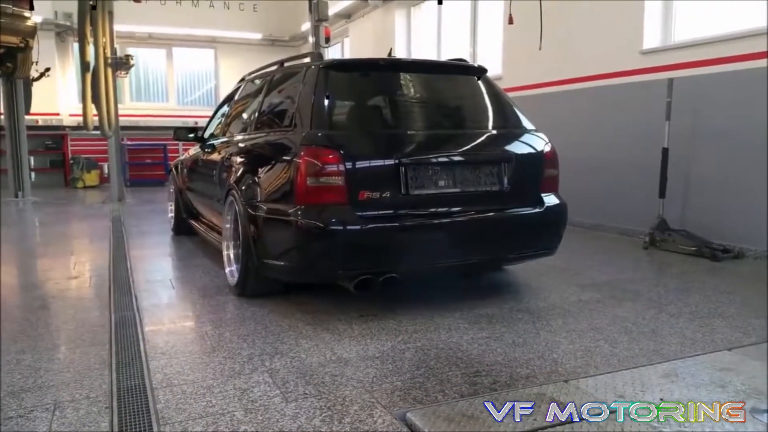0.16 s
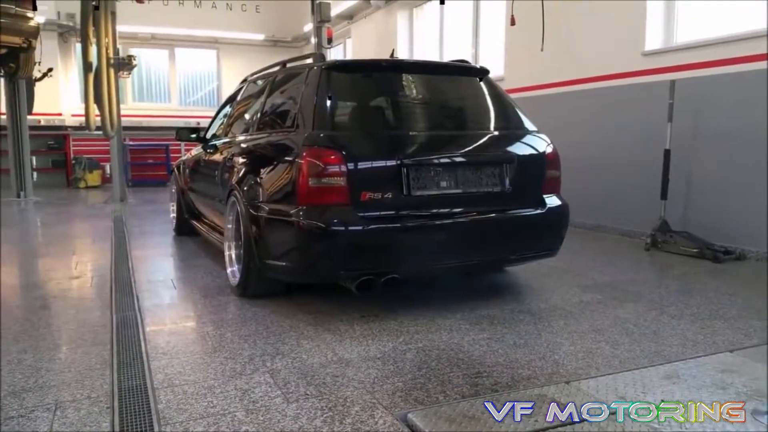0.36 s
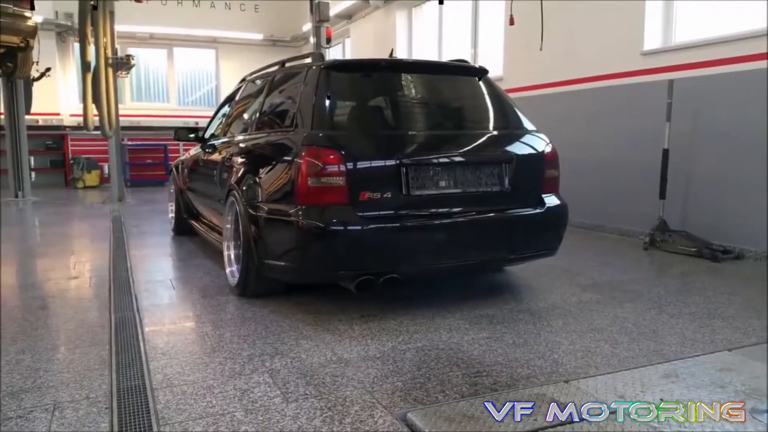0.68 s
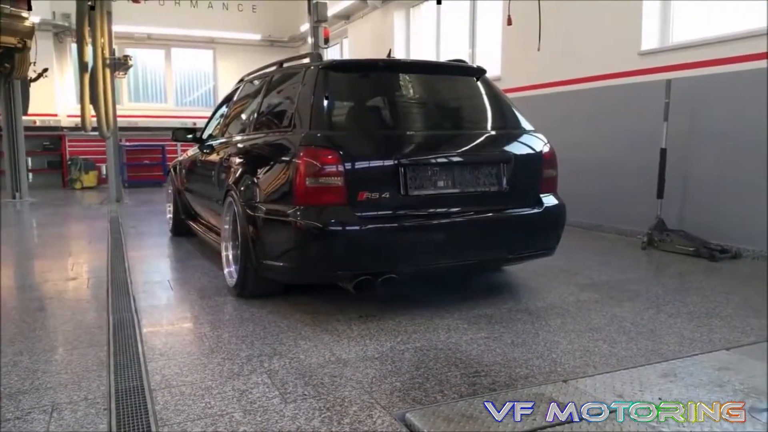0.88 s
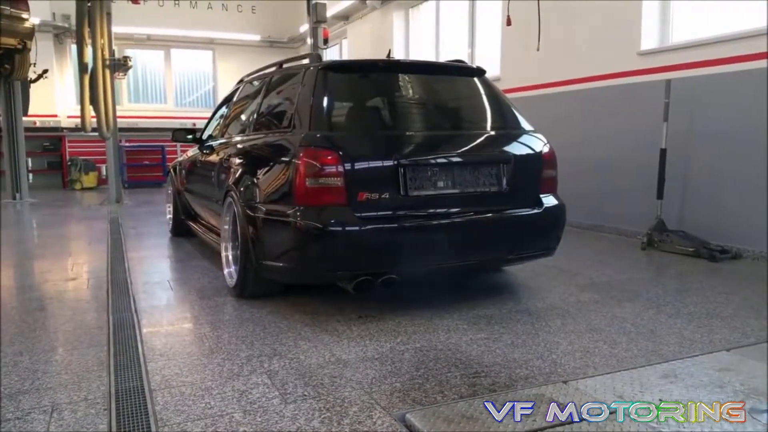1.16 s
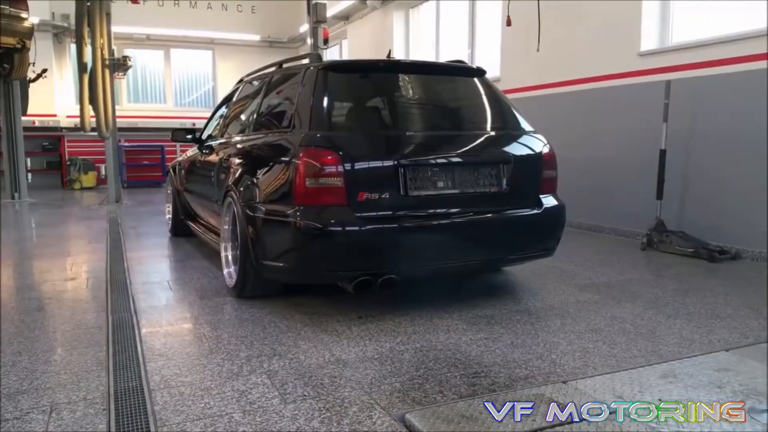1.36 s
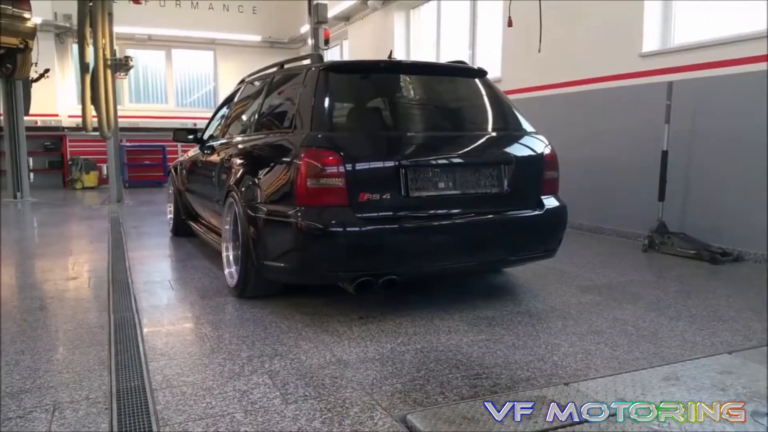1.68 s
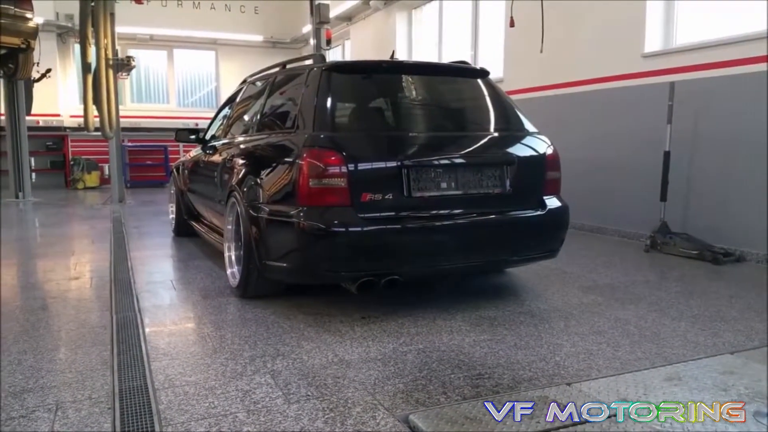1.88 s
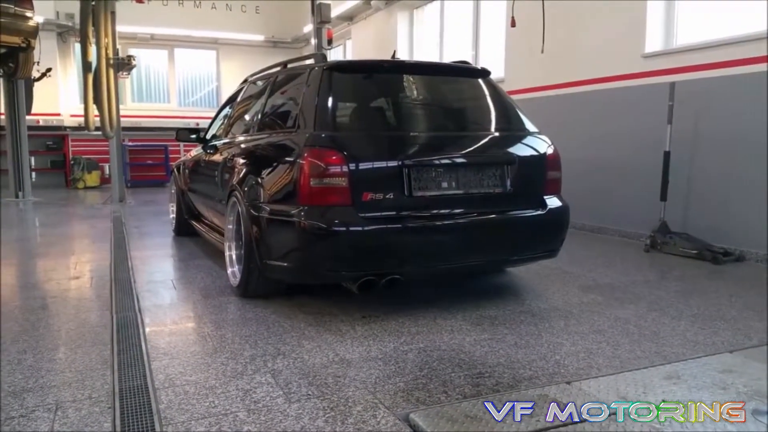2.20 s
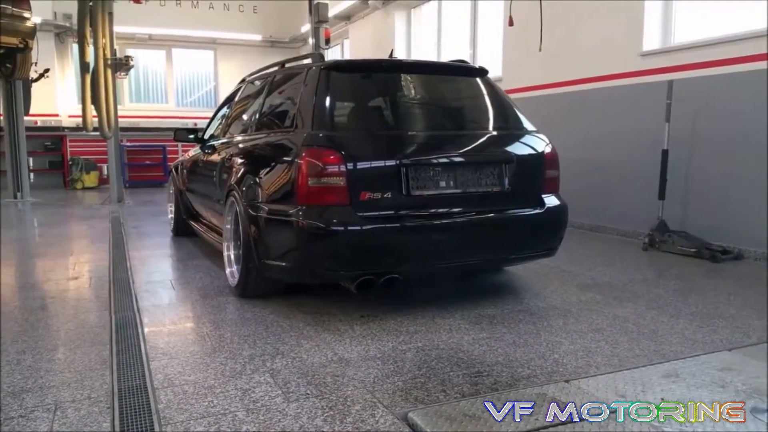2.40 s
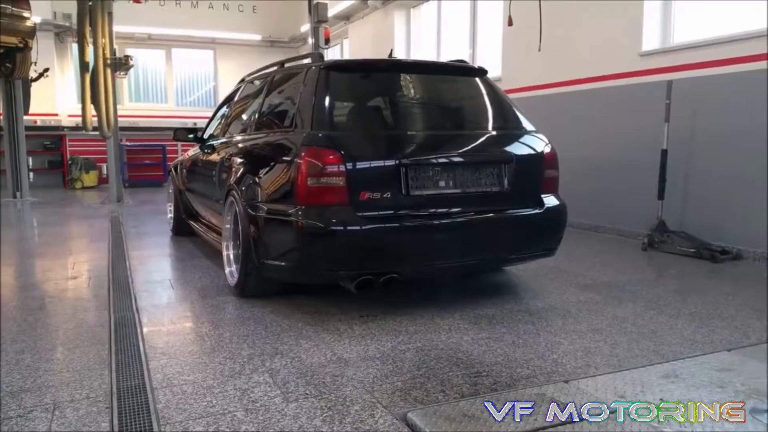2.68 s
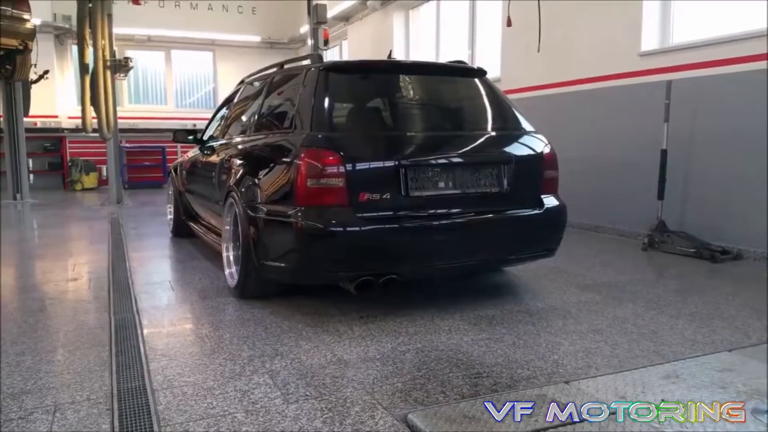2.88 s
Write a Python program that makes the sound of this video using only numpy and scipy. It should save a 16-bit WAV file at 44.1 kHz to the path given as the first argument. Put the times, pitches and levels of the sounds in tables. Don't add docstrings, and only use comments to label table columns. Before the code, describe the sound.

Two throttle blips of a six-cylinder car, heard behind the exhaust: a throaty rising roar, popping overrun, slow fall, then again, with boomy hall echo and slightly squashed peaks on the camera microphone.

```python
import sys
import numpy as np
from scipy import signal
from scipy.fft import rfft, irfft
from scipy.io import wavfile
from scipy.ndimage import uniform_filter1d

SR = 44100
rng = np.random.default_rng(int(sys.argv[2]) if len(sys.argv) > 2 else 0)


def digitize_waveform(pressure):
    field = np.atleast_2d(pressure).T
    bounded = np.clip(field, -1, 1)
    quanta = np.round(bounded * 32767).astype(np.int16)
    wavfile.write(sys.argv[1], SR, quanta)


def magnitude_from_level(level_db):
    exponent = np.asarray(level_db, float) / 20
    return 10 ** exponent


N = 134505
T = np.arange(N) / SR


def evened(x):
    return x / np.sqrt(np.mean(x ** 2) + 1e-20)


def read(points, hz):
    f, value = np.transpose(points)
    return np.interp(np.log(hz + 1), np.log(f + 1), value)


def colour(x, points):
    gain_db = read(points, np.fft.rfftfreq(len(x), 1 / SR))
    return irfft(rfft(x) * magnitude_from_level(gain_db), len(x))


def ring(x, modes, flip=-1):
    out = np.zeros(len(x))
    for k, (hz, width_hz, db) in enumerate(modes):
        b, a = signal.iirpeak(hz, hz / max(width_hz, 3), SR)
        out += flip ** k * magnitude_from_level(db) * signal.lfilter(b, a, x)
    return out


def state(column):
    # start_s, firing_rate_hz, firing_db, unevenness (0-1), gas_rush_db
    engine = [(0, 157.3, -16, .3, -3), (0.098, 157.6, -8.5, 0.09, -5), (.235, 189.8, -13.5, .16, -10),
              (.34, 262, -5.5, 0.06, -6), (.43, 309.4, -10.5, 0.29, -1), (0.528, 296.4, -11, 0.13, 1),
              (.75, 285.3, -20, 0.4, -1), (.95, 234, -18, 0.34, -1), (1.3, 173.5, -22.5, 0.1, -4),
              (1.458, 163.4, -13, .12, -6.5), (1.56, 195.9, -12.5, 0.17, -11), (1.65, 264.8, -6, 0, -4.5),
              (1.781, 338.5, -9, 0.24, 1.5), (1.858, 312.3, -16, 0.3, 0), (2.201, 285.9, -19.5, .3, 0),
              (2.43, 245.1, -18, 0.12, -2), (2.729, 221.6, -27, 0.03, -2.5), (3.002, 155.3, -17, .25, -6)]
    rows = np.array(engine)
    return uniform_filter1d(np.interp(T, rows[:, 0], rows[:, column]), size=900)


def turns():
    return np.cumsum(state(column=1)) / SR


def shut():
    # start_s, end_s
    closed = [
        (-1, 0.083),
        (.455, 1.4),
        (1.81, 4),
    ]
    return uniform_filter1d(sum(1. * (T > a) * (T < b) for a, b in closed), size=500)


def hall(x):
    # pitch_hz, time_to_fade_60_db_s
    fading = [(100, 0.76), (500, 1.45), (2000, 0.7), (8000, 0.7)]
    taps = np.zeros(SR)
    at = np.arange(400, SR - 20, 20)
    taps[at + rng.integers(0, 20, len(at))] = rng.choice([-1., 1.], len(at))
    hz, t, z = signal.stft(taps, SR, nperseg=512)
    faded = z * magnitude_from_level(-60 * t / read(fading, hz)[:, None])
    tail = signal.istft(faded, SR, nperseg=512)[1]
    return signal.fftconvolve(x, tail / np.linalg.norm(tail))[:N]


def rush():
    # pitch_hz, level_db (per Hz)
    hiss = [(60, -21.5), (110, 3), (600, -14.5), (1150, -23), (2000, -23), (2700, -33), (5400, -44.5),
            (6000, -54)]
    level_db, low_cut_db, gated = -18.5, -11.5, 0.18
    gate = 1 - gated + 2 * gated * np.exp(-(turns() % 1) / 0.2)
    hz, t, z = signal.stft(colour(rng.standard_normal(N) * gate, hiss), SR, nperseg=512)
    patches = rng.standard_normal(z.shape[::-1]).T
    patches = uniform_filter1d(patches, size=12, axis=0)
    patches = evened(uniform_filter1d(patches, size=6, axis=1))
    follow = np.clip(np.log2(hz / 300 + 1e-3) / 2, .6, 1)[:, None]
    flow_db = np.interp(t, T, state(column=4))
    z = z * magnitude_from_level(0.73 * patches + follow * flow_db + low_cut_db * (hz[:, None] < 350))
    return magnitude_from_level(level_db) * evened(signal.istft(z, SR, nperseg=512)[1][:N])


def pops():
    # start_s, level_db
    blasts = [(.512, -8.5), (0.422, -17), (.53, -13), (0.547, -12), (0.586, -15.5), (0.908, -16.5),
              (1.814, -18), (1.9, -14), (2.045, -15.5), (2.598, -20)]
    # pitch_hz, level_db (per Hz)
    puff_colour = [(100, -19), (350, 5), (1000, -9), (2000, -17.5), (3200, -26), (5500, -38), (7000, -43.5)]
    thump_ms, tail_s, rise_s, puff_db = 2.5, .2, .0015, -11.5
    length = 8000
    t, out = np.arange(length) / SR, np.zeros(N + length)
    u = t / (thump_ms / 1000 / 2)
    thump = u * (2 - u) * np.exp(-u) * np.minimum(u, 1)
    rise = 1 - np.exp(-(t / rise_s) ** 2)
    for (s, db), grit in zip(blasts, rng.standard_normal((len(blasts), length))):
        puff = magnitude_from_level(puff_db - 60 * t / tail_s) * evened(colour(grit, puff_colour))
        out[round(s * SR):][:length] += magnitude_from_level(db + 12.5) * (thump + rise * puff)
    return out[:N]


def burble():
    # start_s, level_db, fade_db_per_s
    lifts = [
        (0.442, -17.5, -3.5),
        (1.801, -11.5, -14.5),
    ]
    # pitch_hz, width_hz, level_db
    thud = [(84.3, 30, -6.5), (129.6, 32.5, 2), (153.8, 25, -0.5), (231, 44, -4), (317, 60, -3.5)]
    hits_per_s, spread_db, idle_db = 70, 3., -39
    level = magnitude_from_level(idle_db) + sum((T > s) * magnitude_from_level(db + fade_db * (T - s)) for s, db, fade_db in lifts)
    strength = magnitude_from_level(spread_db * np.minimum(rng.exponential(1, N), 3))
    hits = (rng.random(N) < hits_per_s / SR) * strength
    thuds = ring(ring(hits, thud), [(140, 410, 0)])
    return uniform_filter1d(level, size=400) * (.3 + 0.62 * shut()) * evened(thuds)


def firing():
    # multiple, level_db
    orders = [(1, 0.5), (2, -4.5), (3, -7), (4, -13), (5, -20), (6, -25.5), (7, -35)]
    # sixths_of_firing_rate, level_db
    uneven = [(3, -4.5), (8, -11), (9, -11.5), (10, -12.5)]
    # pitch_hz, width_hz, level_db
    pipe_modes = [(172.73, 6.6, 7.5), (240.6, 8.3, 2), (284.9, 7.23, 10), (396, 21, 2.5), (527.7, 12, 7),
                  (620, 6.9, 1), (683, 20, 2.5), (825, 11, 4.5), (888, 30, -0.5)]
    bright_db_per_oct, coast_dull_db, shut_dull_db, open_db = 5.5, -5.5, -2.5, -0.5
    count, rough = turns(), np.clip(state(column=3), 0, 1)
    luck = rng.standard_normal((1200, 2))
    shift, size = (np.interp(count, np.arange(len(r)), r) for r in luck.T)
    wobbly = count + 0.3 * rough * shift
    bright_db = bright_db_per_oct * np.log2(state(column=1) / 280) + coast_dull_db * rough
    shut_db = shut_dull_db * shut()
    pulses = np.zeros(N)
    for k, db in orders:
        tone_db = db + np.log2(k) * bright_db + (k > 2.5) * shut_db
        pulses += magnitude_from_level(tone_db) * np.cos(2 * np.pi * k * wobbly)
    for k, db in uneven:
        pulses += rough * magnitude_from_level(db) * np.cos(np.pi / 3 * round(k) * wobbly)
    drive = pulses * magnitude_from_level(state(column=2) + 2.8 * rough * size)
    return magnitude_from_level(open_db) * drive + ring(drive, pipe_modes, flip=0.92)


def scene():
    hall_db = -4
    pipe = firing() + burble() + pops()
    mono = pipe + magnitude_from_level(hall_db) * hall(pipe) + rush()
    return np.array([mono, mono])


def squelch(x):
    air_edge_hz, drop_from_hz, drop_db, drop_spread_db, spared_db = 9050, 6500, -62.5, 4.5, 8
    hz, t, z = signal.stft(x, SR, nperseg=2048, noverlap=1024)
    hz = hz[:, None]
    power = (abs(z) ** 2).mean(0)
    band_db = 10 * np.log10(uniform_filter1d(power, size=3, axis=0) + 1e-20)
    loud_db = 10 * np.log10(uniform_filter1d(power.sum(0), size=5) + 1e-20)
    whim = rng.standard_normal((len(t), 44))
    bands = np.repeat(whim[:, 1:], 24, axis=1)[:, :len(hz)].T
    chance_db = drop_spread_db * (whim[:, 0] + 1.8 * bands)
    below_hz = drop_from_hz - hz
    safe_db = spared_db * np.clip(below_hz / 150, 0, 1 + below_hz / 2000)
    margin_db = band_db - loud_db - drop_db + chance_db + safe_db
    keep = 1 / (1 + np.exp(-np.clip(3 * margin_db, -30, 30)))
    return signal.istft(z * keep * (hz < air_edge_hz), SR, nperseg=2048, noverlap=1024)[1][:, :N]


def low_pass(x):
    return signal.sosfilt(signal.butter(12, 15830, fs=SR, output="sos"), x)


def record(dry):
    # pitch_hz, left_minus_right_db
    lean = [(550, 0), (1100, -1.5), (5000, -1.3), (9000, -.8)]
    low_cut_hz, ceiling, push_db, knee = 50, 0.84, -0.5, 3.9
    cut = signal.lfilter(*signal.butter(2, low_cut_hz, "high", fs=SR), dry)
    over = magnitude_from_level(push_db) * cut / ceiling
    held = ceiling * over / (1 + abs(over) ** knee) ** (1 / knee)
    leaned = [colour(c, [(f, side * d / 2) for f, d in lean]) for c, side in zip(held, (1, -1))]
    mix = squelch(np.array(leaned))
    return low_pass(mix)


dry = scene()
out = record(dry)
digitize_waveform(out)
```